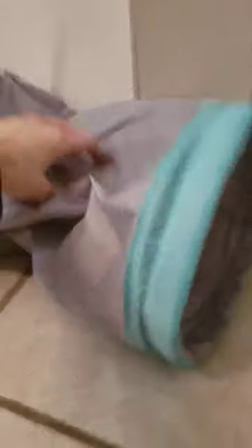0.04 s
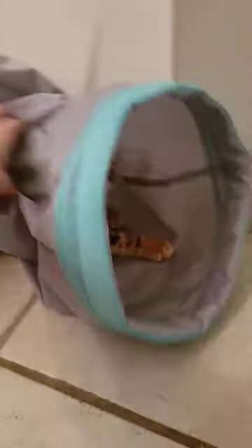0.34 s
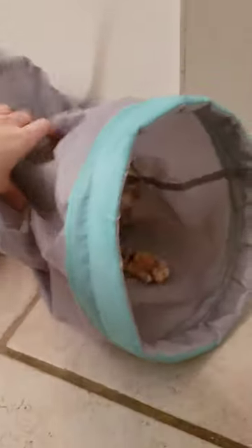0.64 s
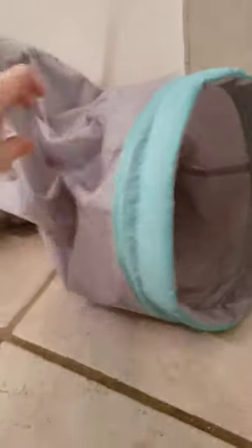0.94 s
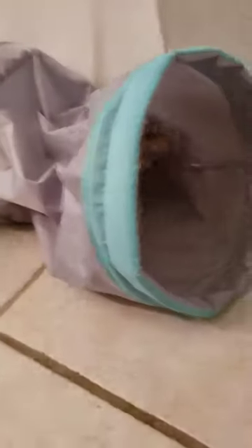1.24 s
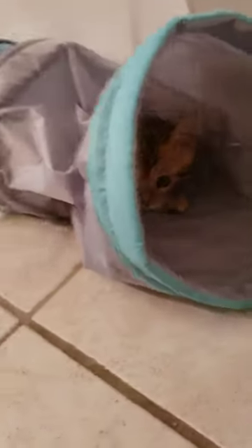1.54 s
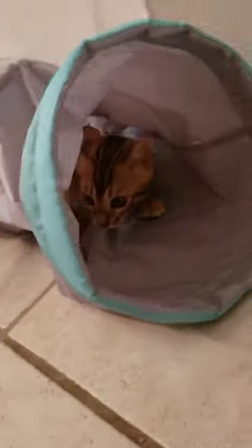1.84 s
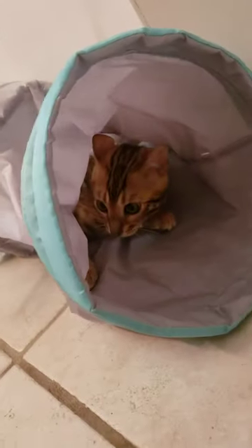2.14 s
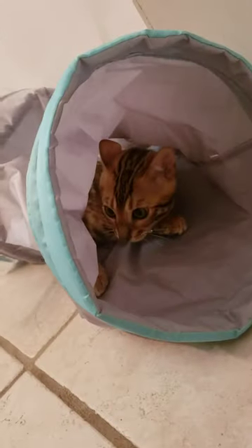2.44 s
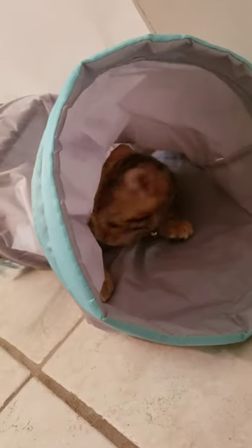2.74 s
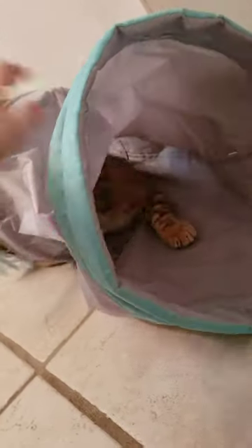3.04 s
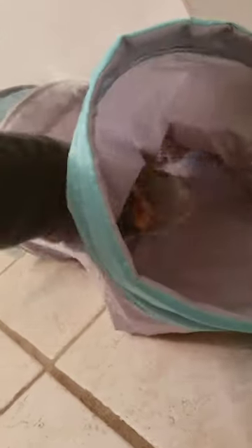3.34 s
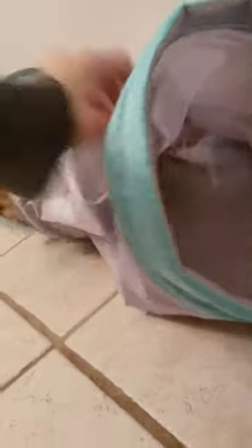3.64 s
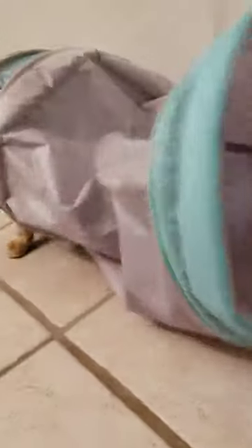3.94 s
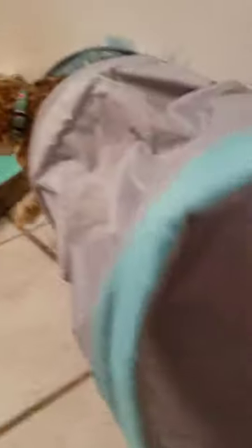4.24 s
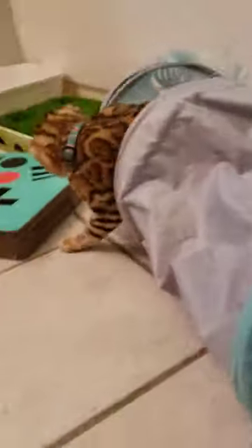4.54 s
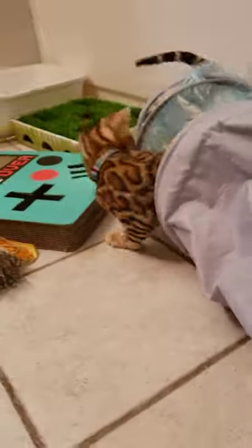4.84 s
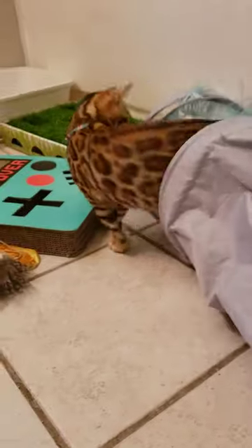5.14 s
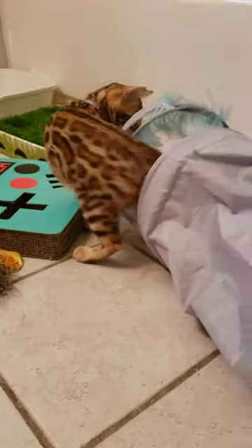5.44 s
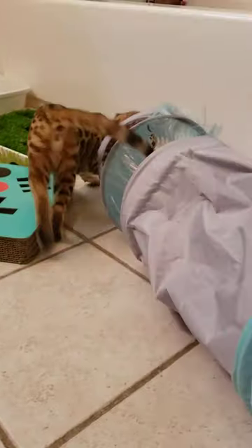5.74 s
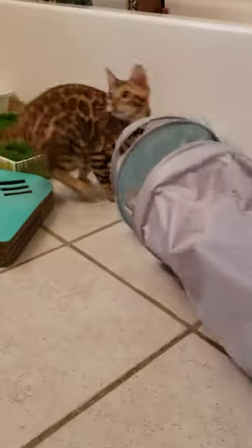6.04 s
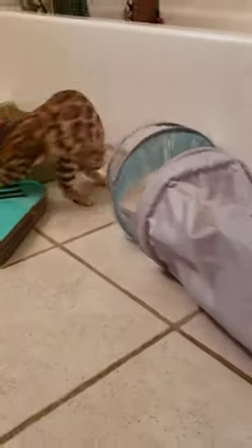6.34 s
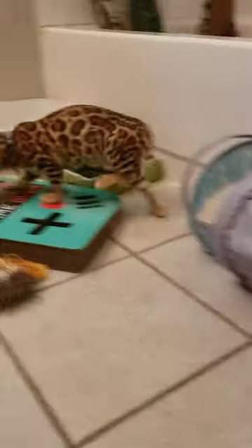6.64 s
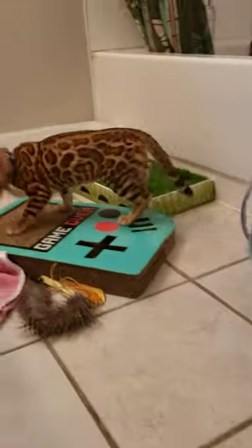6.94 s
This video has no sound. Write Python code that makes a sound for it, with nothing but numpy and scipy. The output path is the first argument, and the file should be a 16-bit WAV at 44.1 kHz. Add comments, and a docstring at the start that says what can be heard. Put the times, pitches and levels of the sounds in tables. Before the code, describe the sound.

A nylon play tunnel crinkles and swishes as a purring kitten scrambles through, its small collar bell tinkling faintly.

```python
"""A small tiled bathroom, two closely spaced microphones near a kitten in a nylon play tunnel.
First a hand ruffles the cloth as the kitten scrambles: threads swish, creases crinkle and snap, panels
flap. From about 1 s the pellet in its collar bell tinkles, and its pulsing purr carries through a lull.
At 3 s the scramble picks up again. Then it climbs out and pads about, farther off, knocks against
a hollow toy tray just after 6 s, and the bell tinkles once more."""
import sys
import numpy as np
from scipy import signal
from scipy.fft import rfft, irfft, next_fast_len
from scipy.io import wavfile
from scipy.ndimage import uniform_filter1d

SR = 44100
rng = np.random.default_rng(int(sys.argv[2]) if len(sys.argv) > 2 else 0)


def output_pcm(signal):
    """Save a mono or channel-first signal as 16-bit PCM at the path in sys.argv[1].

    Samples are clipped to [-1, 1] before scaling.
    """
    pcm = np.clip(np.atleast_2d(signal).T, -1, 1) * 32767
    wavfile.write(sys.argv[1], SR, np.round(pcm).astype(np.int16))


N = 312228

# Levels in the tables are relative, ahead of the mix and the room.
# pushes of paw, body or hand on the cloth: start_s, length_s, slide_db, crumple_db
PUSHES = [(0.0, 0.035, -44.5, -43), (0.097, 0.026, -41.5, -36.5), (0.169, 0.12, -41, -39),
          (0.339, 0.13, -40.5, -41), (0.501, 0.039, -43, -42.5), (0.613, 0.03, -41, -40),
          (0.701, 0.084, -44, -43.5), (0.834, 0.012, -43.5, -44), (1.042, 0.038, -67, -60.5),
          (1.297, 0.043, -57.5, -64), (1.723, 0.021, -53.5, -62), (3.03, 0.069, -56, -52),
          (3.233, 0.053, -46, -41), (3.356, 0.037, -43.5, -42.5), (3.471, 0.023, -43.5, -40),
          (3.65, 0.044, -48, -53), (3.904, 0.028, -56, -55), (3.975, 0.13, -44.5, -50),
          (4.13, 0.053, -52.5, -51), (4.792, 0.014, -49.5, -51), (4.913, 0.09, -56, -63.5),
          (5.333, 0.17, -59.5, -89), (5.622, 0.01, -54.5, -55), (6.108, 0.057, -62.5, -72),
          (6.187, .28, -56, -60)]
# fur brushing along the cloth between pushes: time_s, slide_db, crumple_db
FUR_BRUSH = [(0.0, -61, -64), (.95, -53, -68.5), (1.2, -61.5, -65.5), (1.85, -62.5, -68.5), (2.3, -73, -82),
             (2.46, -84.5, -83.5), (2.66, -85, -85.5), (2.85, -61.5, -67), (2.98, -52, -72.5),
             (3.15, -56, -74), (3.8, -60, -67.5), (4.22, -53.5, -70), (4.36, -60, -69.5),
             (4.95, -59.5, -76), (5.12, -63, -78.5), (5.6, -76.5, -66.5), (5.82, -73, -85),
             (6.08, -72.5, -92), (6.5, -65.5, -78.5), (7.08, -71.5, -76)]
HARD_PUSH_DB = -38.5  # reference level for the rasp and the flapping
# tone of each cloth sound, close up: frequency_hz, gain_db
SWISH_SPECTRUM = [(500, -30.5), (2000, -27), (4700, -14.5), (6200, -17), (7400, -10.5), (8300, -7),
                  (9200, -8), (10600, -1.5), (12000, -0.5), (13500, -5), (15800, -13)]
CRINKLE_SPECTRUM = [(25, -44), (80, -19), (250, 8), (330, -1), (480, 4), (700, 4.5), (1100, -1),
                    (2000, 2.5), (3200, -1), (4700, -2), (6000, -22.5), (9000, -15), (15000, -32)]
FLAP_SPECTRUM = [(20, -32), (60, 1.5), (100, -2.5), (140, 2.5), (190, -5.5), (250, 2), (320, -2),
                 (480, -2.5), (700, -12.5), (1500, -19.5), (4000, -57)]
SNAP_SPECTRUM = [(25, -39), (100, -27.5), (600, -6), (2000, -1), (4200, -4), (6200, -13.5), (8300, -5),
                 (11000, 5.5), (16000, -11.5)]
# creases that snap through: start_s, level_db, treble_db, fold_pitch_hz, fold_ring_db
CREASE_SNAPS = [(0.09, -7.5, -8, 755, 17), (.265, -7.5, -6, 2040, -3), (0.269, -8.5, -19, 4270, 11),
                (0.4182, 1, 0.5, 1970, -1), (0.4284, -1.5, -11, 1620, 4), (0.5443, -5.5, -14, 2000, 2),
                (0.8208, -9.5, -14, 4400, 5.5), (1.105, -23.5, 4, 2380, 3.5), (1.393, -25, -23, 2680, -3),
                (1.534, -26, 1, 2330, -4), (1.77, -29.5, 10, 905, 20), (2.999, -18, 4.5, 3000, 9),
                (3.32, -11, -22, 2310, 1), (3.465, -9, -15.5, 2570, 5), (3.4831, -10.5, -12, 5000, 8.5),
                (3.906, -22.5, -5, 1580, 0), (4.063, -10, -19, 2350, -7), (4.788, -13, -13, 1500, -5)]
# large folds that buckle: start_s, level_db, pitch_hz
LARGE_FOLDS = [(.174, -28.5, 1920), (.2315, -22, 2280), (.495, -35.5, 2010), (.63, -39.5, 612),
               (0.716, -32, 1530), (.85, -28, 3800), (2.871, -55, 857), (3.204, -41.5, 1290),
               (3.241, -32, 1470), (3.515, -35, 1910), (3.533, -42, 3000), (3.951, -42.5, 1540)]
# threads that snag and let go: start_s, level_db
SNAGS = [(1.4235, -37), (3.892, -29), (5.623, -29), (5.648, -30), (5.963, -42), (6.311, -38.5),
         (6.772, -39.5)]
# ribbed weave drawn over itself or the floor, and at 6.23 s a paw scraping along the toy tray: start_s,
# length_s, start_rate_hz, end_rate_hz, level_db
GLIDING_RASPS = [(0.123, .12, 1150, 2300, -41.5), (1.037, 0.11, 1467, 2493, -60),
                 (2.17, 0.19, 4480, 4550, -80.5), (3.108, .1, 2250, 2450, -56.5),
                 (3.636, 0.041, 4940, 4460, -49), (3.8, 0.1, 2610, 2680, -62.5),
                 (4.423, 0.44, 2336, 2404, -71), (4.885, .19, 2145, 1794, -66), (6.23, 0.12, 704, 860, -60.5),
                 (6.521, .14, 2090, 2086, -72)]
# collar bell, two close pairs of modes: pitch_hz, level_db, t60_s
COLLAR_MODES = [(4557, 1, 0.06), (4600, 0.5, 0.065), (11060, 0.5, 0.046), (11070, 0, 0.063)]
# pellet strikes in the bell: start_s, upper_pair_db, lower_pair_db
PELLET_STRIKES = [(.901, -36.5, -50), (1.122, -38, -68), (1.351, -47, -63), (1.489, -45, -69),
                  (1.552, -48, -59), (1.605, -50, -66), (1.7593, -36.5, -57), (1.862, -49, -66),
                  (4.1, -44, -59), (4.151, -44.5, -74), (4.199, -50, -57), (6.3226, -44.5, -63),
                  (6.451, -46.5, -60), (6.59, -47, -64), (6.939, -46, -76), (7.006, -37.5, -52),
                  (7.052, -47, -63.5)]
# strength of the purr: time_s, level_db
PURR_LEVELS = [(1.15, -65), (1.4, -54), (1.68, -61.5), (1.95, -57), (2.18, -68.5), (2.65, -56), (2.85, -66),
               (3.1, -51.5), (4.4, -65.5), (5.75, -62), (6.05, -73.5), (6.85, -58.5)]
# paws and body on the floor and tunnel wall: start_s, level_db, pitch_hz, rise_cycles
SOFT_BLOWS = [(.112, -41.5, 145, 1.8), (.268, -27, 283, 1.33), (.925, -42.5, 680, 0.44),
              (1.238, -44, 716, 0.57), (1.393, -42.5, 420, 0.48), (1.769, -46, 860, 0.65),
              (1.772, -37, 473, 0.65), (3.037, -45.5, 950, 1.5), (3.241, -36, 169, 0.25),
              (3.29, -36, 436, 0.68), (3.385, -48, 332, 0.91), (3.482, -33.5, 495, 0.65),
              (3.489, -42.5, 58, 1), (3.729, -38, 286, 0.21), (3.81, -44.5, 210, 0.67),
              (4.063, -34, 468, 0.8), (4.168, -36, 130, 0.31), (5.147, -49.5, 730, 0.4),
              (5.181, -46.5, 246, 0.89), (5.535, -42.5, 650, 1.55), (5.65, -38, 644, 0.56),
              (5.66, -38, 220, 0.73), (6.162, -33.5, 248.5, 1.26), (6.183, -35.5, 87, 1.04),
              (6.204, -36.5, 228, 0.5), (6.42, -34, 480, 0.76), (6.781, -36.5, 223, 0.51),
              (6.78, -43, 613, 0.82)]
# hollow toy tray: pitch_hz, level_db, t60_s
TOY_TRAY_MODES = [(302, -11.5, 0.057), (570, -7, 0.1), (640, 1.5, 0.036), (765, -0.5, 0.057),
                  (1080, 2, 0.015), (1360, -8, 0.016), (1640, -3.5, 0.011), (2140, -5.5, 0.0058),
                  (2870, -14, 0.0077)]
# knocks on the tray: start_s, level_db
TRAY_KNOCKS = [(6.158, -50.5), (6.396, -28.5), (6.425, -42)]
# standing waves between the walls: pitch_hz, level_db, t60_s
STANDING_WAVES = [(74.5, -61, 0.84), (155.5, -49.5, 0.16), (250, -57.5, 0.29), (446, -63.5, 0.31),
                  (505.3, -59, 0.52)]
# still air of the room: frequency_hz, gain_db
ROOM_TONE_SPECTRUM = [(20, -16), (60, 13), (120, -5.5), (240, -2), (400, -15.5), (2000, -35.5), (7000, -55),
                      (16000, -19.5)]


def cloth_movement(rise_db_per_s=339, sag_db_per_s=10, settle_db_per_s=176.5):
    """Sliding and crumpling levels in dB: each push builds, eases and settles, over the fur's brushing."""
    t = np.arange(N) / SR
    slide_power, crumple_power = undb(curve(FUR_BRUSH)) ** 2
    for start_s, length_s, slide_db, crumple_db in PUSHES:
        age_s = t - start_s
        shape_db = (rise_db_per_s * np.minimum(age_s, 0)
                    - sag_db_per_s * np.clip(age_s, 0, length_s)
                    - settle_db_per_s * np.maximum(age_s - length_s, 0))
        power = undb(np.maximum(shape_db, -100)) ** 2
        slide_power += power * undb(slide_db) ** 2
        crumple_power += power * undb(crumple_db) ** 2
    return 10 * np.log10(slide_power), 10 * np.log10(crumple_power)


def swish(slide_db, split_hz=7600, rasp_growth=0.092, boost_db=7):
    """Threads slide over threads, catching and letting go; the hiss loses rasp as the touch lightens."""
    hiss = colour(grains(per_s=20000, spread_db=3.0), SWISH_SPECTRUM)
    rasp = passband(hiss, split_hz, "low", order=7)
    sheen = passband(hiss, split_hz, "high", order=7)
    rasp_db = rasp_growth * (slide_db - HARD_PUSH_DB)
    catch_db = 2.0 * walk(45)
    return unit(sheen + undb(rasp_db) * rasp) * undb(slide_db + catch_db + boost_db)


def crinkle(crumple_db, trim_db=-4.5):
    """Small creases buckle in flurries, coloured by the folds round them."""
    crackle = colour(grains(per_s=1500, spread_db=1.6), CRINKLE_SPECTRUM)
    crackle = shifting_folds(crackle, depth_db=4.0, rate_hz=40)
    flurry_db = 2.5 * walk(90)
    return crackle / np.std(band(crackle, 860, 4300)) * undb(crumple_db + flurry_db + trim_db)


def shifting_folds(x, depth_db, rate_hz, lowest_hz=250, bands=18):
    """Folds open and close, so resonances come and go: each third octave swells and sinks on its own."""
    size = next_fast_len(N)
    spectrum = rfft(x, size)
    hz = np.fft.rfftfreq(size, 1 / SR)
    band_index = np.clip(3 * np.log2((hz + 1) / lowest_hz), 0, bands - 1)
    shares = (np.maximum(1 - abs(band_index - k), 0) for k in range(bands))
    return sum(irfft(spectrum * share, size)[:, :N] * undb(depth_db * walk(rate_hz)) for share in shares)


def flap(crumple_db, hard_flap_db=-46, growth=1.41):
    """Whole panels flap and boom hollowly as the tunnel heaves under the harder pushes."""
    heave_db = hard_flap_db + growth * (crumple_db - HARD_PUSH_DB)
    boom = colour(diffuse_noise(N), FLAP_SPECTRUM)
    beat_db = 3 * walk(55)
    return boom / np.std(band(boom, 100, 900)) * undb(heave_db + beat_db)


def snaps(tear_db=-13, tear_t60=0.012, crackle_db=-23, crackle_t60=0.065, split_hz=6000, lag_s=0.00024):
    """A taut crease pops through, tears on for a moment and crackles; the fold round it rings hollowly."""
    out, size = np.zeros((2, N)), SR // 8
    decay = undb(tear_db) * fade(tear_t60, size) + undb(crackle_db) * fade(crackle_t60, size)
    for start_s, level_db, treble_db, fold_hz, ring_db in CREASE_SNAPS:
        for mic, late_s in zip(out, (0, lag_s * rng.random())):
            pop = decay * rng.laplace(size=size) / np.sqrt(2)
            pop[0] = 1  # the crease gives way
            body = passband(pop, split_hz, "low")
            treble = undb(treble_db) * passband(pop, split_hz, "high")
            fold = undb(ring_db) * band(pop, fold_hz / 1.07, fold_hz * 1.07, order=1)
            add(mic, start_s + late_s, undb(level_db) * (body + fold - treble))
    return colour(out, SNAP_SPECTRUM)


def pocks(crumple_db, boost_db=7, centre_hz=1400, octaves=3, small_count=900, lag_span_s=0.00025):
    """Folds buckle: a few large ones pock hollowly, many small ones crack drily with the crumpling."""
    out, size = np.zeros((2, N)), SR // 30
    buckles = [(start_s, undb(db) * bump(hz, cycles=1.0, size=size)) for start_s, db, hz in LARGE_FOLDS]
    for when, pitch, strength in rng.random((small_count, 3)):
        gain = undb(crumple_db[int(when * N)] + boost_db) * strength ** 2
        pitch_hz = centre_hz * 2 ** (octaves * (pitch - 0.5))
        buckles.append((when * N / SR, gain * bump(pitch_hz, cycles=0.85, size=size)))
    for start_s, pock in buckles:
        add(out[0], start_s + lag_span_s * (rng.random() - 0.5), pock)
        add(out[1], start_s, pock)
    return out


def thread_ticks(rise_s=0.0023):
    """A snagged thread lets go: a tiny, bright burst of the sliding hiss."""
    out = np.zeros((2, N))
    burst = swell(np.arange(SR // 30) / SR / rise_s)
    for start_s, level_db in SNAGS:
        for mic in out:
            add(mic, start_s, undb(level_db) * burst * rng.standard_normal(len(burst)))
    return colour(out, SWISH_SPECTRUM)


def gliding_rasps(rate_spread=0.15):
    """Ribs of the weave, or a paw scraping along the tray, tick past at an unsteady rate that glides from start
    to end, while the pull swells and fades: a gliding rasp."""
    out = np.zeros(N)
    for start_s, length_s, start_hz, end_hz, level_db in GLIDING_RASPS:
        size = int(length_s * SR)
        pull = signal.windows.tukey(size, 0.5)
        phase = 2 * np.pi * np.cumsum(np.linspace(start_hz, end_hz, size)) / SR
        wobble = passband(rng.standard_normal((2, SR)), rate_spread * start_hz, "low")[:, -size:]
        rasp = unit(wobble[0] * np.cos(phase) + wobble[1] * np.sin(phase))
        add(out, start_s, undb(level_db) * pull * rasp)
    return out


def collar_bell(attack_s=0.00091, rattle_db=-6, mean_gap_s=0.0055, detune=0.00559, bounces=8):
    """The pellet strikes the shell and chatters, landing differently each time; close modes beat."""
    out, size = np.zeros(N), SR // 10
    onset = 1 - np.exp(-np.arange(size) / SR / attack_s)
    for time_s, upper_db, lower_db in PELLET_STRIKES:
        for bounce in range(bounces + 1):
            landing_db = np.array([lower_db, lower_db, upper_db, upper_db]) + 2 * rng.standard_normal(4)
            modes = [(hz * (1 + detune * rng.standard_normal()), mode_db + hit_db, t60)
                     for (hz, mode_db, t60), hit_db in zip(COLLAR_MODES, landing_db)]
            add(out, time_s, undb(rattle_db * np.sqrt(bounce)) * onset * ring(modes, size))
            time_s += mean_gap_s * rng.exponential()
    return out


def pellet_roll(roll_db=-24, roll_t60=0.97):
    """After each strike the pellet rolls to rest inside the shell, keeping up a faint shimmer."""
    rubbing = np.zeros(N)
    for start_s, upper_db, _ in PELLET_STRIKES:
        add(rubbing, start_s, undb(upper_db + roll_db) * fade(roll_t60) * rng.standard_normal(SR // 2))
    shell = ring(COLLAR_MODES)
    return convolve(rubbing, shell / np.linalg.norm(shell))


def purr(pulse_hz=25.4, throat_hz=205, throat_t60=0.019, flutter_db=-4):
    """The larynx shuts about 25 times a second; each pulse thumps the throat and lets air flutter by."""
    level_db, = curve(PURR_LEVELS)
    phase = np.cumsum(pulse_hz * (1 + 0.025 * walk(20))) / SR % 1
    pulses = (np.diff(phase, prepend=0) < 0) * undb(2.8 * walk(25))
    throat = ring([(throat_hz, 0, throat_t60)])
    throb = unit(band(convolve(pulses, throat), 110, 280))
    airflow = np.exp(-phase / 0.45)
    flutter = unit(band(rng.standard_normal(N) * airflow, 150, 306, order=3))
    return (throb + undb(flutter_db) * flutter) / 2 * undb(level_db)


def paw_thuds(scuff_db=-9, scuff_t60=0.043):
    """A padded blow swells and dies within a few cycles, and the paw scuffs on briefly."""
    out, t = np.zeros(N), np.arange(SR // 2) / SR
    for start_s, level_db, hz, cycles in SOFT_BLOWS:
        friction = unit(band(rng.standard_normal(len(t)), hz / 2, hz * 2))
        scuff = friction * np.minimum(t * hz / cycles, 1) * fade(scuff_t60)
        add(out, start_s, undb(level_db) * (bump(hz, cycles, len(t)) + undb(scuff_db) * scuff))
    return out


def toy_tray(crunch_db=-25, crunch_t60=0.067):
    """A hind paw kicks the hollow, well damped tray, which scrapes and drops back on the tiles."""
    blows = np.zeros(N)
    for start_s, level_db in TRAY_KNOCKS:
        blow = undb(crunch_db) * fade(crunch_t60) * rng.standard_normal(SR // 2)
        blow[0] = 1  # the impact ahead of the scrape
        add(blows, start_s, undb(level_db) * blow)
    body = sum((-1) ** k * ring([mode]) for k, mode in enumerate(TOY_TRAY_MODES))
    return convolve(blows, body)


def bathroom(x, wet_db, t60=0.38, gap_s=0.00099, dull_hz=9000):
    """Close tiled walls add a dense, short tail and a few standing waves to the direct sound."""
    tail = diffuse_noise(SR // 2) * fade(t60)
    tail[:, :int(gap_s * SR)] = 0
    tail /= np.sqrt(np.sum(tail ** 2) / 2)
    tail = passband(tail, dull_hz, "low", order=1)
    return x + undb(wet_db) * convolve(x, tail + ring(STANDING_WAVES))


def room_tone(level_db=-65):
    """The still air of the room: a faint, low noise all round the microphones."""
    return unit(colour(diffuse_noise(N), ROOM_TONE_SPECTRUM)) * undb(level_db + 0.61 * walk(4.2))


def diffuse_noise(size):
    """Noise from all sides: two close microphones share most of the bass and part in the treble."""
    mid, side = rng.standard_normal((2, size))
    side = passband(side, 900, "high", order=1) + 0.1 * side
    return np.array([mid + side, mid - side]) / np.sqrt(2)


def grains(per_s, spread_db, lags_samples=(-15, -5, 1, 9)):
    """Tiny, unequal clicks from patches of cloth, each patch with its own lag between the microphones."""
    out = np.zeros((2, N))
    for lag in lags_samples:
        strength = undb(spread_db * np.minimum(rng.exponential(size=N), 2 * np.pi))
        fires = rng.random(N) < per_s / len(lags_samples) / SR
        clicks = fires * strength * rng.choice([-1, 1], N)
        out += [np.roll(clicks, lag), clicks]
    return out


def bump(hz, cycles, size):
    """A soft pulse of tone that peaks after the given cycles and dies away."""
    turns = hz * np.arange(size) / SR
    return swell(turns / cycles) * np.sin(2 * np.pi * turns)


def swell(age):
    """An envelope that peaks at age 1, then decays."""
    return age * np.exp(1 - age)


def ring(modes, size=SR // 2):
    """Free ringing of modes: pitch_hz, level_db, t60_s."""
    t = np.arange(size) / SR
    return sum(undb(db) * fade(t60, size) * np.sin(2 * np.pi * hz * t) for hz, db, t60 in modes)


def fade(t60, size=SR // 2):
    """Decay by 60 dB every t60 seconds."""
    return np.exp(-np.log(1000) * np.arange(size) / SR / t60)


def walk(rate_hz):
    """Glides between random levels, rate_hz of them a second; spread 1."""
    hold = int(SR / rate_hz)
    steps = np.repeat(rng.standard_normal(N // hold + 1), hold)
    return unit(uniform_filter1d(steps, hold)[:N])


def curve(rows):
    """The columns of a table, joined by straight lines in time."""
    time_s, *columns = np.transpose(rows)
    return [np.interp(np.arange(N) / SR, time_s, column) for column in columns]


def colour(x, spectrum, size=4096):
    """Minimum-phase filter through points of frequency_hz, gain_db."""
    hz, db = np.transpose(spectrum)
    bins_hz = np.fft.rfftfreq(size, 1 / SR)
    gain = undb(np.interp(np.log(bins_hz + 1), np.log(hz), db))
    cepstrum = irfft(np.log(gain))
    cepstrum[1:size // 2] *= 2
    cepstrum[size // 2 + 1:] = 0
    return convolve(x, irfft(np.exp(rfft(cepstrum))))


def passband(x, hz, kind, order=2):
    """Low-, high- or band-pass."""
    return signal.sosfilt(signal.butter(order, hz, kind, fs=SR, output="sos"), x)


def band(x, lo_hz, hi_hz, order=2):
    """Band-pass, kept under half the sample rate."""
    return passband(x, [lo_hz, min(hi_hz, 0.49 * SR)], "band", order)


def convolve(x, response):
    """Pass a sound through an impulse response; gives rows of channels."""
    return signal.fftconvolve(np.atleast_2d(x), np.atleast_2d(response), axes=1)[:, :N]


def add(track, start_s, sound):
    """Mix a sound into a track."""
    i = max(int(start_s * SR), 0)
    track[i:i + len(sound)] += sound[:max(N - i, 0)]


def unit(x):
    """Scale to a standard deviation of 1."""
    return x / np.std(x)


def undb(db):
    """Decibels to gain."""
    return 10 ** (np.asarray(db) / 20)


def scene():
    """Cloth and purr are close to the microphones; floor sounds carry more room, the bell a short tail."""
    slide_db, crumple_db = cloth_movement()
    sliding = swish(slide_db) + thread_ticks()
    crumpling = crinkle(crumple_db) + pocks(crumple_db) + flap(crumple_db)
    near = sliding + crumpling + purr()
    far = paw_thuds() + toy_tray() + gliding_rasps()
    return (bathroom(collar_bell() + pellet_roll(), wet_db=0.0, t60=0.22)
            + bathroom(near, wet_db=-2.5)
            + bathroom(undb(-2.0) * snaps(), wet_db=-3.0)
            + bathroom(undb(-3.5) * far, wet_db=3.5)
            + room_tone())


def record(dry):
    """The phone behind the microphones cuts the top steeply."""
    top_hz = 15950
    return signal.sosfilt(signal.ellip(10, 0.2, 70, top_hz, fs=SR, output="sos"), dry)


dry = scene()
out = record(dry)
output_pcm(out)
```